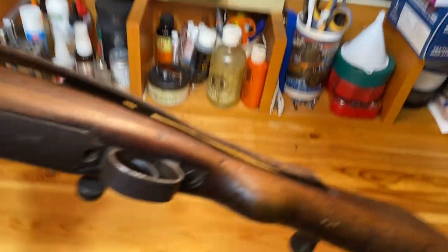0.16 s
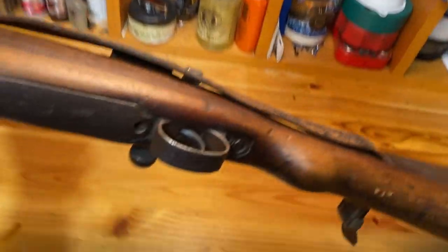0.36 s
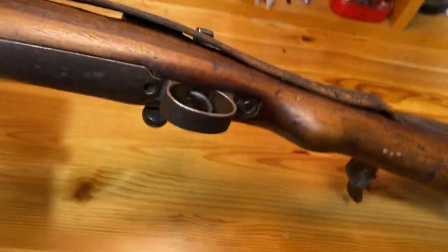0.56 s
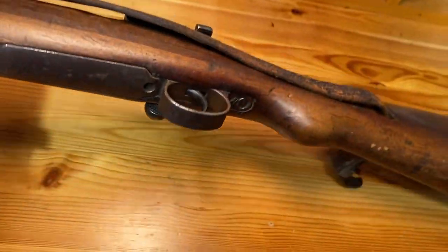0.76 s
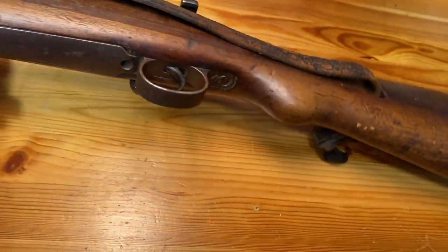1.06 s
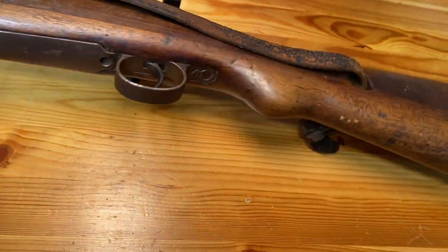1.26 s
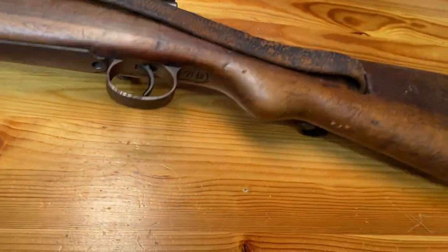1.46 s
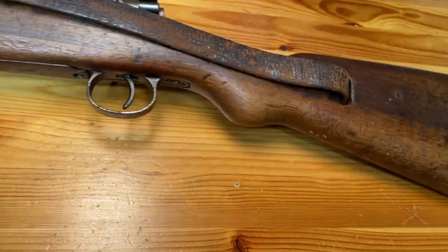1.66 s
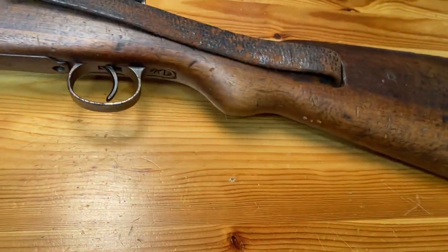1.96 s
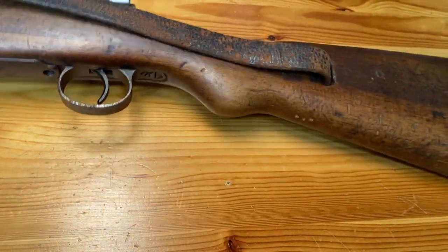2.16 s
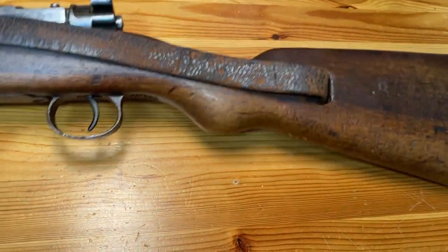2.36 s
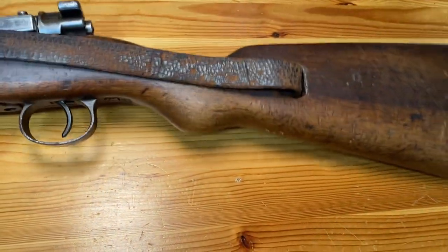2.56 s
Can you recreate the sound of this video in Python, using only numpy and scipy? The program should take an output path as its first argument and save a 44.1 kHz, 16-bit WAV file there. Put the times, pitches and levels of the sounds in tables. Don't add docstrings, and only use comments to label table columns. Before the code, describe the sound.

Wooden rifle laid on a wooden table: faint metal ticks, leather creak, then hard hollow knocks

```python
import sys
import numpy as np
from scipy import signal
from scipy.fft import rfft, irfft
from scipy.io import wavfile
from scipy.ndimage import uniform_filter1d

SR = 44100
rng = np.random.default_rng(int(sys.argv[2]) if len(sys.argv) > 2 else 0)


def to_wav(sig):
    pcm = np.clip(np.atleast_2d(sig), -1, 1) * 32767
    pcm = np.round(pcm).astype(np.int16)
    wavfile.write(sys.argv[1], SR, pcm.T)


def volts(x):
    e = np.asarray(x, float) / 20
    return 10 ** e


N = 119070
T = np.arange(N) / SR
WAVER_DB = 2.5
GRAIN_DB = 2.2


def unit(x):
    return x / np.sqrt(np.mean(x ** 2))


def band(x, hz, width_hz):
    hz = min(hz, .45 * SR)
    return signal.lfilter(*signal.iirpeak(hz, hz / width_hz, fs=SR), x)


def double_band(x, hz, width_hz):
    return band(band(x, hz, width_hz), hz, width_hz)


def steep(x, hz, width_hz):
    low_hz = max(hz - width_hz / 2, hz / 3)
    high_hz = min(hz + width_hz / 2, .45 * SR)
    return signal.sosfilt(signal.butter(5, [low_hz, high_hz], "band", fs=SR, output="sos"), x)


def walk(rate):
    size = int(SR / rate)
    once = uniform_filter1d(rng.standard_normal(N), size)
    return unit(uniform_filter1d(once, size))


def curve(rows, column=1):
    rows = np.array(rows)
    return np.interp(T, rows[:, 0], rows[:, column])


def fade(start_s, t60):
    age = np.maximum(T - start_s, 0)
    attack = 1 - np.exp(-age / .0004)
    return attack * np.exp(-np.log(1000) * age / t60)


def push(start_s, level_db, push_ms):
    u = np.clip((T - start_s) * 1000 / push_ms, 0, 1)
    shape = np.sin(np.pi * u) ** 2
    return volts(level_db) * shape / shape.sum()


def directed_pushes(rows):
    return sum(np.sign(way) * push(s, db, ms) for s, db, ms, way in rows)


def mode(force, hz, t60):
    pole = np.exp(2j * np.pi * hz / SR - np.log(1000) / (t60 * SR))
    return signal.lfilter([0, pole.imag], [1, -2 * pole.real, abs(pole) ** 2], force)


def ring(force, modes, waver_db=0., share=0.):
    spread_turns = 0.59
    out = np.zeros(N)
    for hz, db, t60 in modes:
        early_t60 = 1 / (1 / t60 + hz / spread_turns / np.log(1000))
        early = mode(force, hz, early_t60)
        level = volts(db + waver_db * walk(49))
        out += level * (mode(force, hz, t60) - min(share, .95) * early)
    return out


def diffuse(x, bands, late_s):
    noise = rng.standard_normal(N)
    tail = sum(volts(db) * unit(double_band(noise, hz, hz)) * fade(late_s, t60) for hz, t60, db in bands)
    return signal.fftconvolve(x, tail[:SR])[:N]


# pitch_hz [Hz], density_db [dB per Hz]
AIR_SPECTRUM = [(12, -4.5), (28, -4), (90, -24.5), (131, -13.5), (190, -31.5), (349, -30.5), (534, -36),
                (1100, -42), (16000, -53)]
# pitch_hz [Hz], width_hz [Hz], level_db [dB]
FAN_HUM = [(126, 20, -65), (234.8, 16, -78)]


def air():
    hz = np.maximum(np.fft.rfftfreq(N, 1 / SR), 12)
    corner_hz, density_db = np.array(AIR_SPECTRUM).T
    shape = volts(np.interp(np.log(hz), np.log(corner_hz), density_db))
    tone = volts(-55.5) * unit(irfft(rfft(rng.standard_normal(N)) * shape, N))
    lows = signal.sosfilt(signal.butter(2, 170, fs=SR, output="sos"), tone)
    lumps = volts(-1.5 * walk(10) + 4.0) - 1
    hum = np.zeros(N)
    for pitch_hz, width_hz, level_db in FAN_HUM:
        narrow = unit(double_band(rng.standard_normal(N), pitch_hz, width_hz))
        hum += volts(level_db + 1.6 * walk(12.97)) * narrow
    return tone + lumps * lows + hum


# pitch_hz [Hz], t60_s [s], level_db [dB]
ROOM_BANDS = [(195.7, 0.65, -3.5), (500, 0.37, -26), (1000, 0.27, 6.5), (2000, 0.07, 14), (4000, 0.64, 6.5),
              (8000, 0.38, 17), (12850, 0.36, -3)]


def room(x):
    room_db = -19
    return volts(room_db - 45) * diffuse(x, ROOM_BANDS, 0.00071)


# pitch_hz [Hz], level_db [dB], t60_s [s]
FRAME_MODES = [(33, -1, .42), (50, -14, .2)]
# start_s [s], level_db [dB], push_ms [ms], direction [+1 or -1]
FRAME_PUSHES = [(0.851, -38.5, 2.8, 1), (.935, -29.5, 30, 1), (1.44, -47, 18, 1), (1.568, -22.5, 9.7, 1),
                (1.681, -21, 14, 1), (1.742, -27.5, 5.7, 1), (1.802, -32, 9.3, 1), (1.871, -47.5, 15, 1),
                (2.077, -35, 8.4, 1), (2.22, -39.5, 20, 1), (2.287, -29, 3.5, 1), (2.3, -10, 6.4, -1),
                (2.421, -16.5, 13.5, -1), (2.496, -39.5, 3.6, 1), (2.542, -38, 22, 1), (2.639, -36, 27, 1)]


def frame():
    return ring(directed_pushes(FRAME_PUSHES), FRAME_MODES)


# pitch_hz [Hz], level_db [dB], t60_s [s]
BEAM_MODES = [(64.3, -14, 0.48), (89, 3, .15), (106, -0.5, 0.3)]
# start_s [s], level_db [dB], push_ms [ms], direction [+1 or -1]
BEAM_PUSHES = [(0.851, -48, 1.9, 1), (1.567, -24, 6.8, 1), (1.681, -32.5, 9.9, 1), (1.742, -21.5, 4.9, 1),
               (1.821, -32.5, 4.6, 1), (1.93, -50.5, 5.1, 1), (2.019, -47, 6.6, 1), (2.079, -33.5, 4.3, 1),
               (2.2, -50, 5.5, 1), (2.291, -27, 4.77, 1), (2.304, -13, 6, -1), (2.423, -23, 5.9, -1),
               (2.498, -29, 6.5, 1), (2.559, -36, 6.2, 1)]


def beams():
    return ring(directed_pushes(BEAM_PUSHES), BEAM_MODES)


# start_s [s], slip_rate [slips per s], level_db [dB]
CREAK_COURSE = [
    (1.24, 110, -71),
    (1.27, 120, -61.5),
    (1.31, 77, -59.5),
    (1.35, 99, -57.5),
    (1.39, 62, -53.5),
    (1.43, 99, -93),
]
# pitch_hz [Hz], width_hz [Hz], level_db [dB]
CREAK_RESONANCES = [(770, 160, 7.5), (1200, 41, 5), (4100, 1000, -1), (6850, 1200, -8), (10000, 4000, 0.5)]
# start_s [s], level_db [dB]
SLIDE_COURSE = [(1.24, -84.5), (1.30, -68), (1.40, -59.5), (1.48, -57.5), (1.56, -57), (1.9, -64),
                (2.1, -71.5), (2.7, -65)]
# pitch_hz [Hz], width_hz [Hz], level_db [dB]
SLIDE_RESONANCES = [(400, 540, 0), (732, 410, -1), (1340, 550, -5.5), (1870, 140, -17.5),
                    (2600, 250, -13.5), (11500, 15000, -13.5)]


def sling():
    slip_rate = curve(CREAK_COURSE) * (1 + 0.24 * walk(49))
    phase = np.cumsum(slip_rate) / SR
    slips = np.diff(np.floor(phase), prepend=0) * volts(2.4 * walk(90))
    slips = slips * (T > 1.22) * (T < 1.44)
    creak = np.zeros(N)
    for hz, width_hz, db in CREAK_RESONANCES:
        creak += volts(db) * np.sqrt(SR / width_hz) * band(slips, hz, width_hz) / 8
    creak = volts(curve(CREAK_COURSE, column=2)) * 15 * creak
    noise = rng.standard_normal(N) * volts(0.87 * walk(70))
    rub = sum(volts(db) * unit(double_band(noise, hz, 0.79 * w)) for hz, w, db in SLIDE_RESONANCES)
    return creak + volts(curve(SLIDE_COURSE)) * unit(rub)


# start_s [s], level_db [dB], pitch_hz [Hz], width_hz
# [Hz], t60_s [s]
FITTING_RATTLES = [(0.1792, -59.5, 1000, 500, 0.024), (0.332, -65.5, 2740, 555.6, 0.053),
                   (0.4415, -59.5, 2350, 3550, 0.11), (0.5242, -61, 2700, 2900, .03),
                   (0.713, -55, 1200, 905, 0.072), (0.7145, -57.5, 2750, 1200, 0.032),
                   (0.771, -63.5, 890, 890, 0.063), (0.8612, -52, 2723, 1910, 0.089),
                   (0.8613, -57, 5990, 4000, 0.021), (0.9025, -43, 12300, 4200, 0.048),
                   (0.9028, -56, 1100, 885, 0.068), (0.9025, -57.5, 2900, 2520, 0.1),
                   (0.9036, -41, 7950, 2700, 0.019), (0.904, -50.5, 4850, 3240, 0.037),
                   (0.9553, -54.5, 8400, 3060, 0.032), (0.9563, -62.5, 1300, 900, 0.06),
                   (0.9562, -46.5, 3800, 1300, 0.025), (.9565, -46, 5750, 1500, 0.021),
                   (0.959, -62, 3130, 3000, 0.096), (1.0908, -66, 1200, 972, 0.046),
                   (1.5286, -55, 2500, 500, 0.042),
                   (1.5644, -40, 2490, 1810, 0.13), (1.565, -59, 4580, 2200, 0.26),
                (1.569, -56, 8450, 6500, 0.081), (1.616, -47.5, 10200, 5000, 0.015),
                (1.627, -55.5, 8000, 8000, 0.018), (1.668, -40, 1500, 2200, 0.049),
                (1.674, -47, 2000, 3000, 0.032), (1.679, -43.5, 2400, 2100, 0.14),
                (1.6966, -26.5, 1133, 1410, 0.17), (1.6965, -41, 2650, 1500, 0.19),
                (1.6975, -52.5, 8900, 5020, 0.04), (1.701, -46, 7700, 1600, 0.027),
                (1.7015, -51, 5260, 1200, 0.05), (1.706, -59.5, 5960, 4000, 0.3),
                (1.707, -67, 11200, 5000, 0.47), (2.075, -60.5, 2540, 1500, 0.1),
                (2.2811, -41, 1500, 1104, 0.048), (2.283, -53, 2520, 1200, 0.047),
                (2.3051, -46.5, 5450, 6030, 0.37), (2.304, -48, 11500, 7000, 0.17),
                (2.349, -52, 9000, 8950, 0.022), (2.3712, -51.5, 9700, 5970, 0.021),
                (2.399, -58.5, 5380, 400, 0.21), (2.4035, -53.5, 12240, 5460, 0.072),
                (2.429, -55, 5770, 7160, 0.031), (2.497, -54, 2470, 2520, 0.077),
                (2.558, -62, 2830, 3000, .05)]
# start_s [s], level_db [dB]
SWIVEL_CHINKS = [(2.3715, -48.5), (2.4041, -41.5), (2.414, -48)]
# pitch_hz [Hz], level_db [dB], t60_s [s]
SWIVEL_MODES = [(10450, -2, 0.047), (12600, 4, .035), (9420, -14, 0.065), (7600, -21, 0.025),
                (4100, -14, 0.033), (14200, -8, .04)]
# pitch_hz [Hz], level_db [dB], t60_s [s]
BOLT_TAP_MODES = [(870, 1, 0.033), (835, -12, 0.16), (1066, 11.5, 0.017), (1240, -16, 0.013),
                  (1470, -8, 0.014), (1640, -14, 0.025), (700, -36, 0.015)]


def ticks():
    noise = rng.standard_normal(N) * volts(GRAIN_DB * walk(300))
    rattles = np.zeros(N)
    for start_s, db, hz, width_hz, t60 in FITTING_RATTLES:
        rattles += volts(db) * unit(steep(noise, hz, width_hz)) * fade(start_s, t60)
    swivel_force = sum(push(s, db, 0.1) for s, db in SWIVEL_CHINKS)
    chinks = ring(swivel_force, SWIVEL_MODES, 3.0)
    tap = ring(push(.8615, -33, 0.58), BOLT_TAP_MODES, WAVER_DB)
    return rattles + chinks + steep(tap, 1465, 1510)


# pitch_hz [Hz], level_db [dB], t60_s [s]
TOP_MODES = [(142.6, -4, 0.062), (186.7, 2, 0.14), (224.5, -8.5, 0.25), (418, 9, 0.037), (461.7, 2.5, 0.11),
             (541, -3, 0.024), (558, 5, 0.058), (711, -1, 0.046), (624, -1.5, 0.029), (880, -9.5, 0.033),
             (1154, 2, 0.019), (1500, -12.5, 0.075), (2900, -22.5, .03)]
# pitch_hz [Hz], level_db [dB], t60_s [s]
STOCK_MODES = [(182.5, 1.5, 0.23), (279, -2.5, 0.16), (361.8, 1, 0.18), (477, 5, 0.14), (565.8, 8.5, 0.074),
               (703, -19, 0.26), (722.3, 4.5, 0.087), (788, 6, 0.069), (882.5, 5, 0.07), (995, 4.5, 0.061),
               (1150, -8.5, 0.079), (1300, -14.5, 0.19), (1600, -5, 0.074), (2314, -19, 0.023)]
# pitch_hz [Hz], t60_s [s], level_db [dB]
BOARD_BANDS = [(210, 0.27, -10.5), (486, 0.18, -7), (820, 0.053, -7), (1320, 0.05, -27), (2200, 0.034, -37),
               (3460, 0.043, -38)]
# start_s [s], table_db [dB], stock_db [dB], contact_ms [ms], crack_db [dB]
BLOWS = [(0.443, -67.5, -79, 0.59, -60), (0.8501, -60.5, -57.5, 0.56, -69),
         (1.5657, -16.5, -34.5, 0.7, -45.5), (1.6781, -19, -35, 1.05, -74), (1.743, -29.5, -32, 2.33, -82),
         (1.82, -42, -49, 0.74, -73), (2.0765, -25.5, -67, 1.07, -67), (2.3037, -24.5, -11, 0.13, -25.5),
         (2.4226, -31, -37.5, 0.68, -38), (2.4982, -35.5, -37, 0.7, -61), (2.555, -49, -50, 2.06, -68)]


def knocks():
    crack_t60_s, crack_hz = 0.05, 1500
    spread_share = 0.65
    top = sum(push(s, db, ms) for s, db, _, ms, _ in BLOWS)
    stock = sum(push(s, db, ms) for s, _, db, ms, _ in BLOWS)
    pole = np.exp(-2 * np.pi * crack_hz / SR)
    grit = unit(signal.lfilter([1], [1, -pole], rng.standard_normal(N)))
    grit = signal.sosfilt(signal.butter(2, 900, "high", fs=SR, output="sos"), grit)
    grit = grit * volts(GRAIN_DB * walk(600))
    crack = grit * sum(volts(db) * fade(s, crack_t60_s) for s, _, _, _, db in BLOWS)
    boards = diffuse(top + volts(6.0) * stock, BOARD_BANDS, 0.0036)
    top_ring = ring(top, TOP_MODES, WAVER_DB, spread_share)
    stock_ring = ring(stock, STOCK_MODES, WAVER_DB, spread_share)
    return top_ring + stock_ring + boards + crack


def scene():
    near = knocks() + ticks() + sling()
    return (near + room(near) + frame() + beams() + air())[None]


def roll_off(x):
    return signal.sosfilt(signal.butter(12, 16360, fs=SR, output="sos"), x)


def record(dry):
    low_hz, top_hz = 18, 15500
    x = signal.sosfilt(signal.butter(1, low_hz, "high", fs=SR, output="sos"), dry)
    x = x / (1 + np.abs(x) ** 8) ** (1 / 8)
    x = signal.lfilter([1, .5], [1.5], x)
    x = signal.sosfilt(signal.ellip(6, .1, 50, top_hz, fs=SR, output="sos"), x)
    return roll_off(x)


dry = scene()
out = record(dry)
to_wav(out)
```